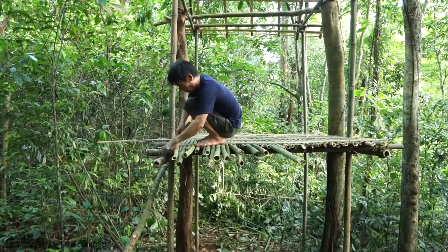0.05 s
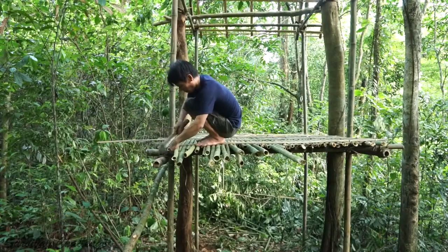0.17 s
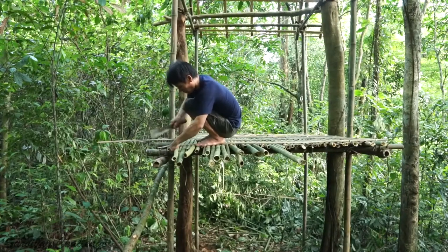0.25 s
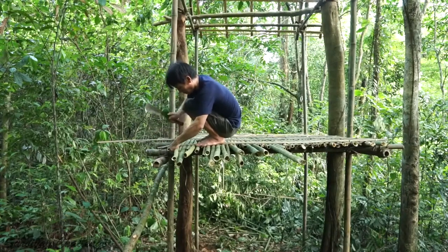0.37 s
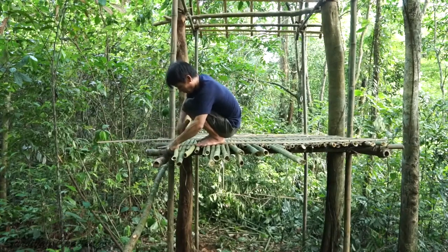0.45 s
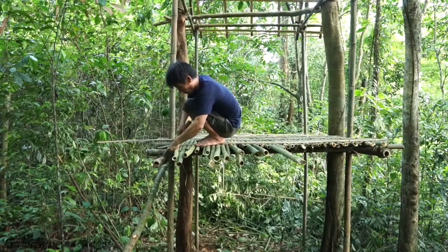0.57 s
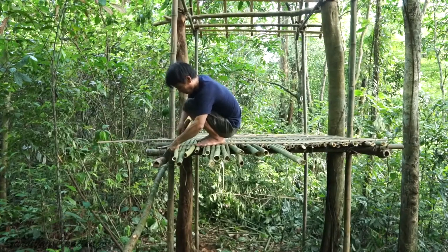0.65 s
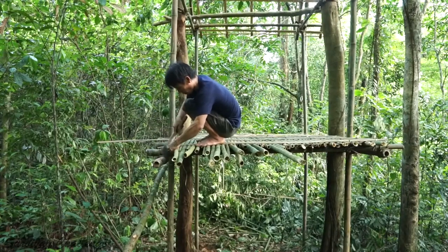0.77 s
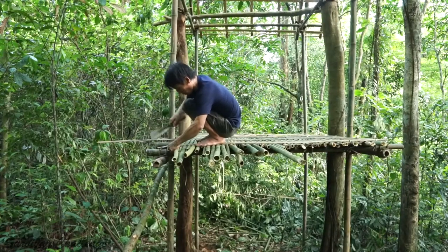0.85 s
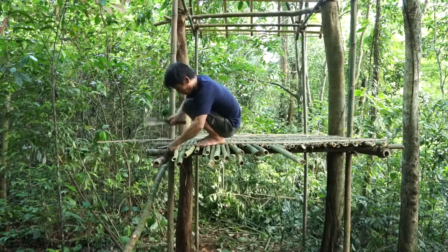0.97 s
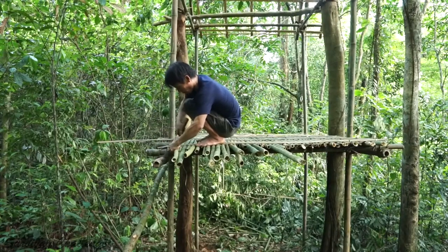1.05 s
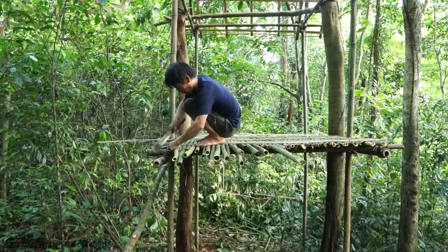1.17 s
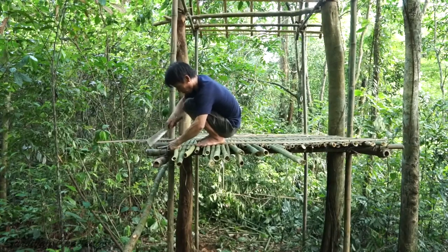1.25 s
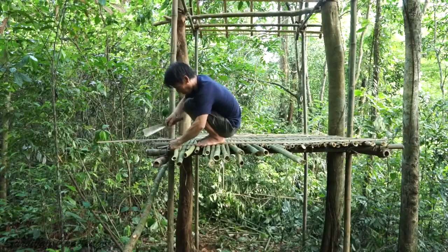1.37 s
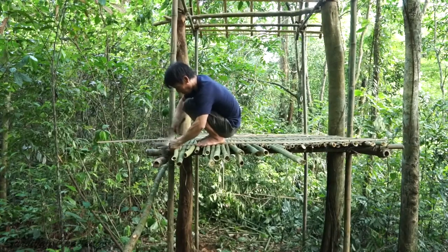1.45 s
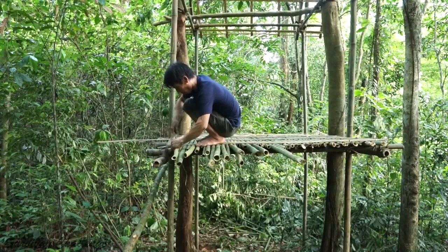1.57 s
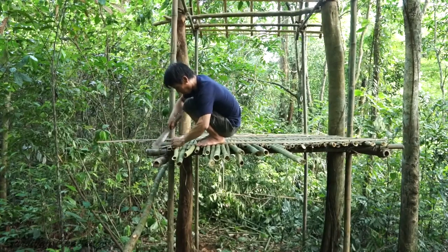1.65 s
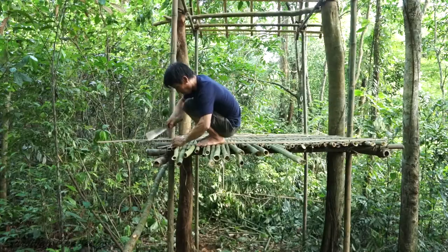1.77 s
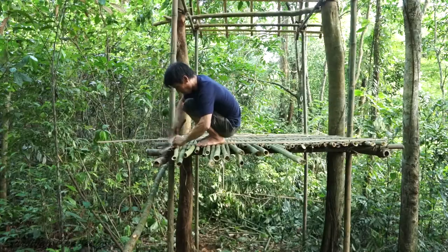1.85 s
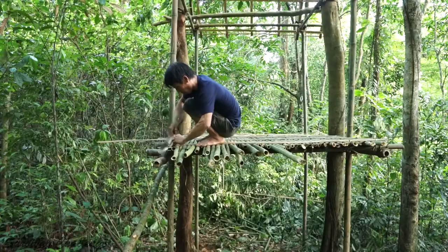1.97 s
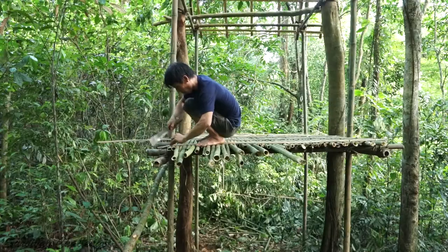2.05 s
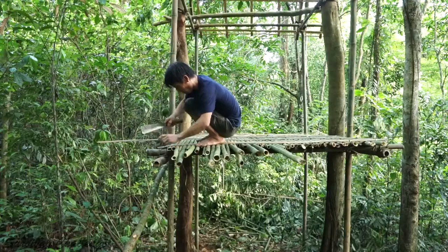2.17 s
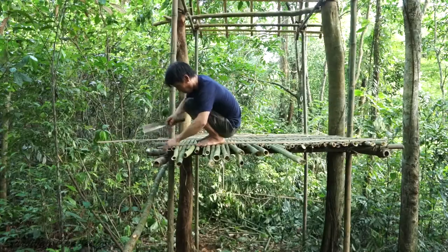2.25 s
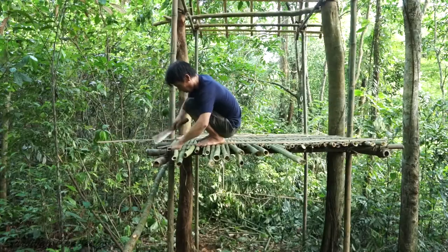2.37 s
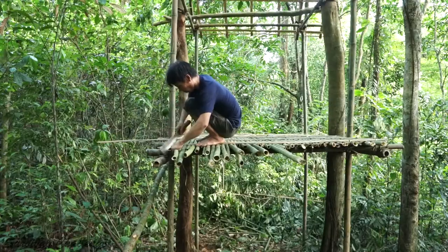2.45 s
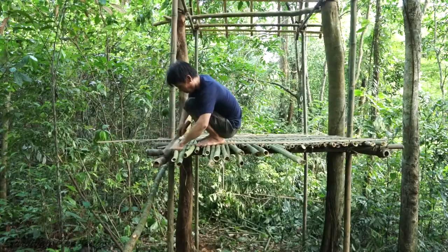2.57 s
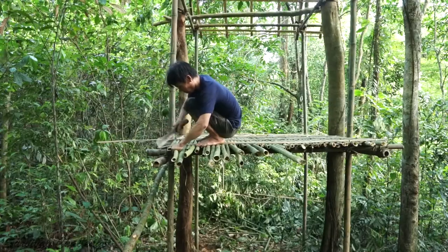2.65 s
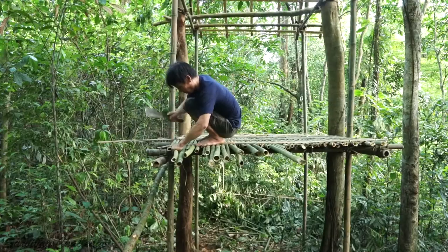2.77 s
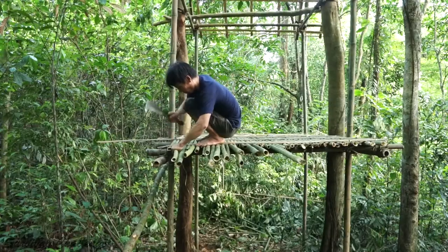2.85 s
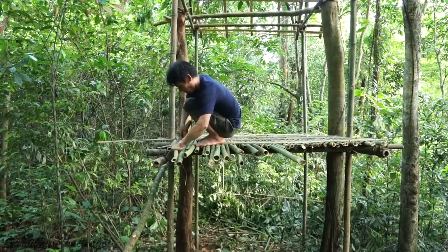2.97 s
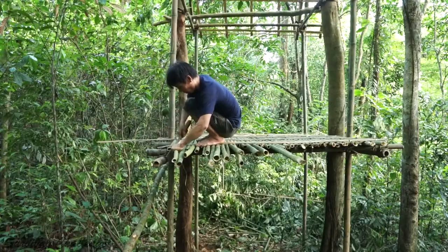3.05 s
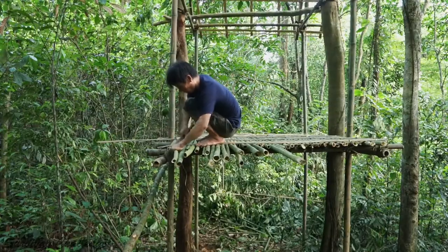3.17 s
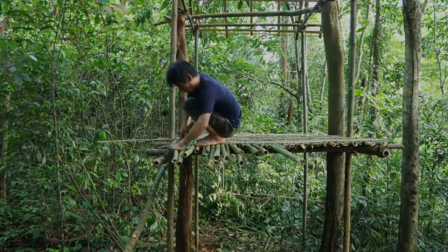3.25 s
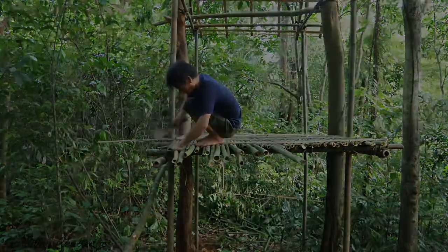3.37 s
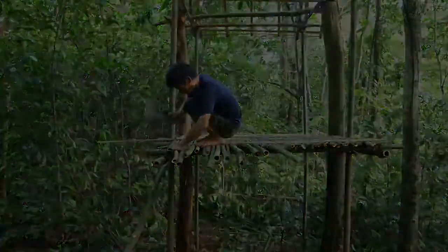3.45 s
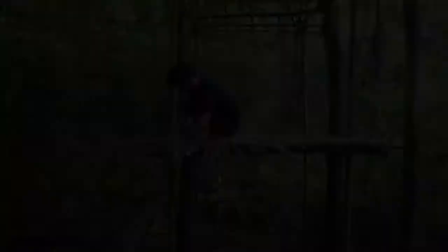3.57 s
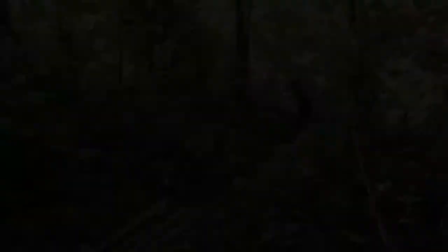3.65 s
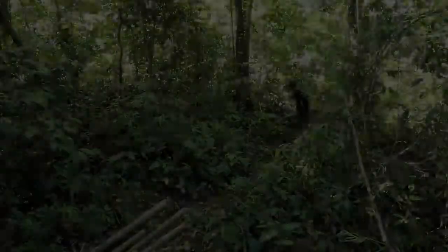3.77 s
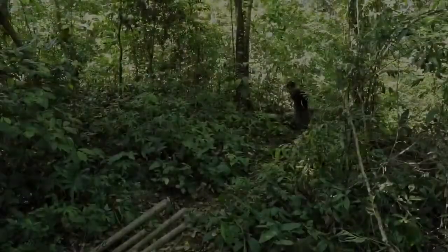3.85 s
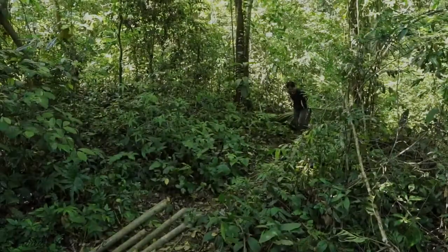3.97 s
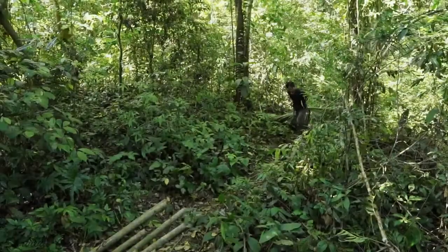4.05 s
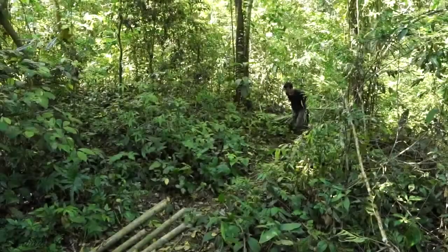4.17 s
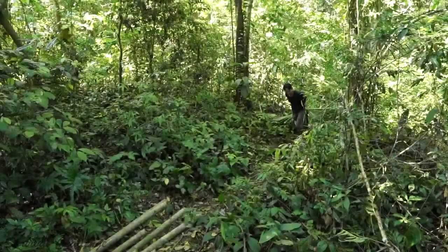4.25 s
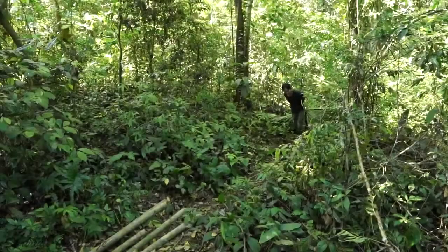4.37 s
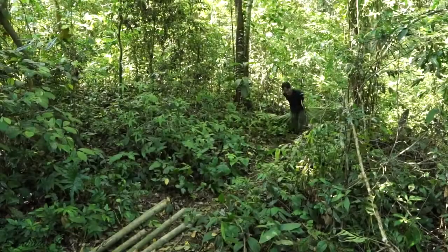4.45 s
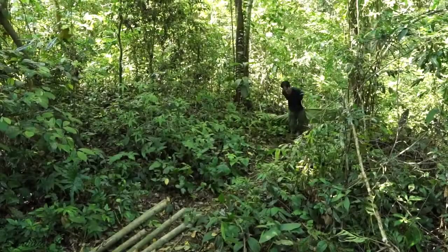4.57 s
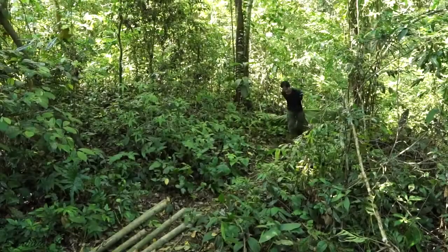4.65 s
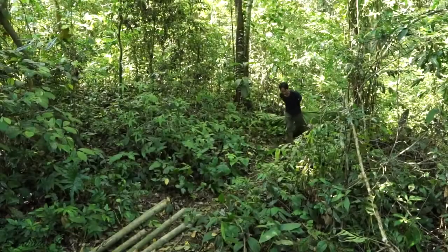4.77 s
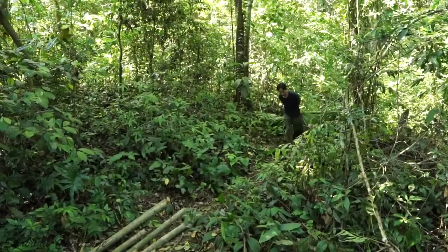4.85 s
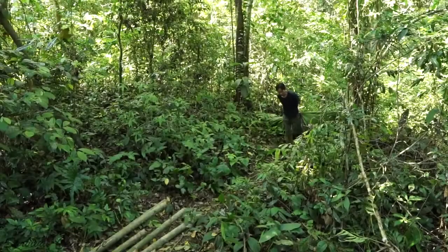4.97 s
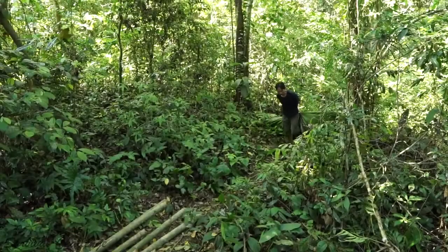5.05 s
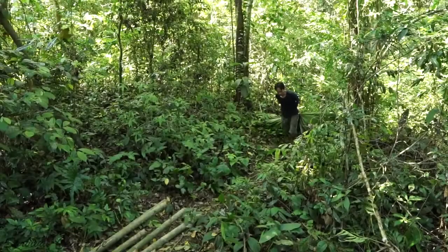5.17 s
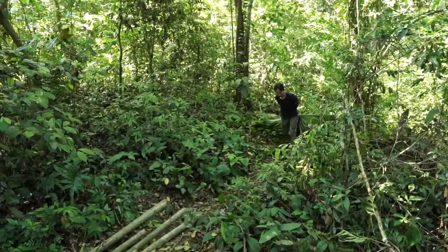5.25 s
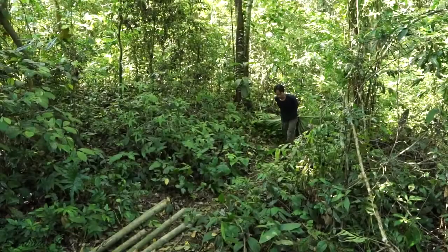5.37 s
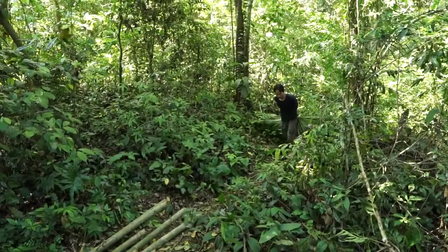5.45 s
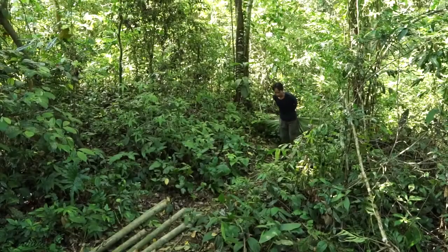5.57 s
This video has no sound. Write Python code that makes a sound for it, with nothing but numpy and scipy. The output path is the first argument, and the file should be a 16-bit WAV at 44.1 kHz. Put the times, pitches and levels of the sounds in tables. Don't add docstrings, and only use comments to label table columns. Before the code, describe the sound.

Outdoors in jungle, a blade strikes bamboo poles in six spaced blows, hollow and cracking, with loose poles chattering between and short echoes off trunks. Cicadas drone softly, a bee buzzes faintly, low mains hum sits underneath. After a tiny gap, a walker pushes through leaves: dense steady hiss, a few dry twig snaps. The microphone hears the knocks close, nearly mono.

```python
import sys
import numpy as np
from scipy import signal
from scipy.fft import rfft, irfft
from scipy.io import wavfile
from scipy.ndimage import uniform_filter1d

SR = 44100
rng = np.random.default_rng(int(sys.argv[2]) if len(sys.argv) > 2 else 0)


def linear_from_db(decibels):
    return 10 ** (np.asarray(decibels, float) / 20)


def master_out(mix):
    frames = np.transpose(np.atleast_2d(mix))
    ceiling = np.clip(frames, -1, 1)
    pcm = np.round(ceiling * 32767).astype(np.int16)
    wavfile.write(sys.argv[1], SR, pcm)


N = 247401
T = np.arange(N) / SR
CUT_S, RETURN_S = 3.655, 3.692

# (time [s], peak level [dB], crack level [dB], ring t60 [s], crack t60 [s])
BLOW_EVENTS = [
    (0.557, -0.5, 5.5, 0.13, 0.13),
    (1.1385, -5, -2, 0.1, 0.22),
    (1.575, -5, 5, 0.1, 0.056),
    (1.975, -5, 4, 0.16, 0.043),
    (2.605, -18, -4, 0.15, 0.09),
    (3.025, -4, 1.5, 0.066, 0.17),
]


def unit(x):
    return x / np.sqrt(np.mean(x ** 2))


def bump(s, width):
    return np.exp(-((T - s) / width) ** 2)


def butterworth(x, order, hz, kind="low"):
    return signal.sosfilt(signal.butter(order, hz, kind, fs=SR, output="sos"), x)


def ring(x, hz, width):
    return signal.lfilter(*signal.iirpeak(min(hz, 0.45 * SR), hz / width, SR), x)


def coloured(x, spectrum):
    hz, db = np.transpose(spectrum)
    log_hz = np.log(np.fft.rfftfreq(len(x), 1 / SR) + 1)
    gain = linear_from_db(np.interp(log_hz, np.log(hz), db))
    return unit(irfft(rfft(x) * gain, len(x)))


def walk(rate):
    hold = int(SR / rate)
    steps = np.repeat(rng.standard_normal(N // hold + 1), hold)
    return 0.98 * uniform_filter1d(uniform_filter1d(steps, hold), hold)[:N]


def grains(count, scatter_db):
    sizes = np.minimum(rng.exponential(size=count), 5)
    return rng.standard_normal(count) * linear_from_db(scatter_db * sizes)


def add(out, s, sound, peak_db):
    i = int(s * SR)
    out[i:i + len(sound)] += (sound * linear_from_db(peak_db) / np.abs(sound).max())[:N - i]


def knock(modes, crack_db, t60, crack_t60, rise):
    t = T[:SR // 3]
    onset = 1 - np.exp(-(t / max(rise, 1e-4)) ** 2)
    strike = linear_from_db(-60 * t / (0.0059 + 4 * rise))
    chatter = rng.standard_normal(len(t)) * onset
    body = np.zeros(len(t))
    for hz, width, db in modes:
        decay = linear_from_db(-60 * t / t60 * (1 + hz / 5000))
        body += linear_from_db(db) * ring(chatter * (strike + decay), hz, width) * np.sqrt(100 / width)
    skin = rng.standard_normal(len(t)) * np.sqrt(onset) * (linear_from_db(-60 * t / crack_t60) + 4 * strike)
    skin = butterworth(skin, 2, 2500, "high")
    sound = body / np.abs(body).max() + linear_from_db(crack_db - 3) * skin / np.abs(skin).max()
    return butterworth(sound, 4, 10800) + 0.094 * sound


def blows():
    # (frequency [Hz], bandwidth [Hz], level [dB])
    pole_modes = [
        [(1110, 140, 1.5), (2154, 34, -2.5), (2350, 26, -9), (2680, 25, -21), (2980, 52, -17), (4200, 60, -21),
         (6400, 46, -21), (7900, 34, -8)],
        [(1000, 120, 6.5), (1650, 24, -7), (2130, 39, -6.5), (3000, 17, -7), (4500, 37, -4.5), (6340, 165, -8),
         (8040, 31, -12)],
        [(960, 95, 1), (2570, 59, -10), (4700, 54, 5), (8750, 96, -19), (9430, 76, 13)],
        [(980, 89, 5.5), (1450, 39, -2), (2020, 200, -1), (4530, 58, -8), (6600, 65, 1), (7800, 19, -0.5),
         (7640, 81, -9)],
        [(360, 15, 11.5), (537, 74, 17), (1020, 24, 15), (1210, 47, -11), (1730, 34, 1)],
        [(886, 95, 4), (1610, 190, 6.5), (2580, 56, 7), (4000, 47, -20), (5900, 240, -11), (7300, 38, -18),
         (7500, 45, -4)],
    ]
    # (frequency [Hz], bandwidth [Hz], level [dB])
    slats = [(1900, 2200, -29)]
    out = np.zeros(N)
    for (s, db, crack_db, t60, crack_t60), modes in zip(BLOW_EVENTS, pole_modes):
        damped = [(hz, width + 60 + 0.05 * hz, level) for hz, width, level in modes]
        add(out, s, knock(damped + slats, crack_db, t60, crack_t60, rise=0.002), db + 4)
    return out


def taps():
    # (time [s], peak level [dB], body frequency [Hz], crack level [dB])
    tap_events = [(0.137, -18.5, 765, -18), (0.211, -15.5, 1320, 6), (0.224, -17.5, 1240, 9),
                  (0.241, -19, 507, 7), (0.478, -34, 684, 10), (1.389, -29.5, 2390, 9),
                  (1.489, -14, 3000, -32), (1.504, -20, 1070, 3), (1.542, -15.5, 3050, -17),
                  (1.597, -12.5, 980, -19), (1.613, -22, 877, -16), (1.644, -16.5, 1910, 4),
                  (1.672, -9, 2500, 1), (1.678, -22, 1080, -5), (1.705, -16.5, 2410, -3),
                  (1.749, -25, 2644, 7), (1.755, -19, 2750, -11), (1.886, -28.5, 2490, -12),
                  (2.299, -43, 1660, -13), (2.814, -17, 3320, 11), (2.828, -24, 3320, 8),
                  (3.127, -28, 1610, -13)]
    out = np.zeros(N)
    for s, db, hz, crack_db in tap_events:
        t60 = 0.087 * (1000 / hz) ** 0.36
        modes = [(hz, 0.14 * hz, 1.5), (2.64 * hz, hz, -7), (2000, 3500, -4)]
        add(out, s, knock(modes, crack_db, t60, 3 * t60, rise=0.0004), db)
    return out


def thuds():
    # (time [s], peak level [dB], frequency [Hz])
    thud_events = [(0.138, -25, 347), (0.155, -26, 333), (1.43, -42, 152), (2.404, -43, 138),
                   (2.679, -34, 150), (2.937, -39, 164), (3.227, -27, 476), (3.241, -24.5, 155),
                   (3.45, -33, 150), (3.482, -33, 110), (3.545, -31, 418), (3.608, -30, 163),
                   (3.644, -32, 181)]
    t60 = 0.063
    out, t = np.zeros(N), T[:SR // 4]
    for s, db, hz in thud_events:
        push = rng.standard_normal(len(t)) * linear_from_db(-60 * t / (1.63 * t60))
        add(out, s, ring(ring(push, hz, 4 / t60 + 0.096 * hz), hz, 3.7 * hz), db)
    return out


def booms():
    # (time [s], peak level [dB], frequency [Hz], t60 [s])
    boom_events = [(.137, -22, 1200, .08), (.214, -29.5, 500, 0.27), (.56, -10.5, 505, 0.2),
                   (.79, -31, 910, .2), (1.143, -24.5, 443, 0.42), (1.49, -26.5, 1090, 0.07),
                   (1.543, -26, 950, 0.08), (1.574, -7.5, 1090, 0.075), (1.59, -29, 252, 0.16),
                   (1.672, -18.5, 1080, .07), (1.98, -18.5, 380, 0.21), (1.976, -8.5, 1740, 0.079),
                   (2.604, -15, 1010, 0.11), (2.814, -22.5, 250, .025), (3.029, -15, 513, 0.12),
                   (3.027, -13, 1100, .09), (1.759, -31, 1400, 0.084), (3.432, -31, 137, 0.1),
                   (3.862, -21.5, 810, 0.056), (5.267, -36, 278, 0.072)]
    out, t = np.zeros(N), T[:SR // 4]
    for s, db, hz, t60 in boom_events:
        push = rng.standard_normal(len(t)) * linear_from_db(-60 * t / t60) * (1 - np.exp(-t / 0.0034))
        add(out, s, ring(ring(push, hz, 0.78 * hz), hz, 2.4 * hz), db)
    return out


def twigs():
    # (time [s], peak level [dB], accent frequency [Hz])
    snap_events = [
        (3.861, -10, 2600),
        (3.885, -18, 762),
        (3.939, -23, 872),
        (4.352, -11.5, 3250),
        (4.376, -16.5, 3400),
        (4.385, -20, 3610),
        (4.403, -20, 931),
        (4.448, -19, 861),
        (4.797, -19, 850),
        (5.267, -9.5, 7450),
    ]
    out, t = np.zeros(N), T[:SR // 10]
    for s, db, hz in snap_events:
        decay = linear_from_db(-60 * t / 0.033) + 1.1 * linear_from_db(-60 * t / 0.0046)
        crack = rng.standard_normal(len(t)) * decay
        broad = butterworth(crack, 3, (700, 9000), "band")
        add(out, s, broad + 1.7 * ring(crack, hz, 0.38 * hz), db - 0.6)
    return out


def trunks(source):
    # (frequency [Hz], level [dB], t60 [s])
    echo_bands = [
        (202, 6.5, 0.19),
        (754, 6, 0.17),
        (2500, -3, 0.43),
        (6000, 3, 0.48),
        (11000, -19, 0.93),
    ]
    t = T[:SR // 2]
    response = np.zeros(len(t))
    for hz, db, t60 in echo_bands:
        band = unit(ring(rng.standard_normal(len(t)), hz, 1.4 * hz))
        response += linear_from_db(db - 60 * t / t60) * band * np.sqrt(hz)
    response *= 1 - np.exp(-t / 0.0022)
    response /= np.sqrt(np.sum(response ** 2))
    return linear_from_db(-14.5) * signal.fftconvolve(source, response)[:N]


def swishes():
    # (time [s], rms level [dB], centre frequency [Hz], rise [s])
    brush_events = [(.212, -32, 4500, 0.022), (.215, -28.5, 1100, .02), (0.79, -37, 850, 0.017),
                    (1.359, -33.5, 4000, 0.034), (1.564, -18.5, 1610, 0.0023), (3.08, -26, 2500, 0.036),
                    (3.345, -35, 1000, 0.015), (3.15, -29, 3000, 0.04), (3.861, -29.5, 3500, 0.0031),
                    (3.88, -31, 1500, .06), (4.3, -40, 6000, 0.041), (4.353, -37, 4000, 0.0037),
                    (4.63, -43, 900, .04), (4.781, -40, 2500, .02)]
    events = [(*row, 0.22) for row in brush_events]
    for s, db, _, _, crack_t60 in BLOW_EVENTS:
        events.append((s, db - 22, 2600, 0.014, 0.21 + 1.7 * crack_t60))
    out, t = np.zeros(N), T[:SR // 2]
    for s, db, hz, rise, t60 in events:
        ticks = ring(grains(len(t), scatter_db=3.5), hz, 2.15 * hz)
        ticks = unit(butterworth(ticks, 3, 10500))
        envelope = (1 - np.exp(-(t / rise) ** 2)) * linear_from_db(db - 60 * t / t60)
        i = int(s * SR)
        out[i:i + len(t)] += (ticks * envelope)[:N - i]
    return out


def leaves():
    # (frequency [Hz], spectral density [dB per Hz])
    leaf_spectrum = [(30, -34), (80, -17.5), (146, -17), (400, -14.5), (800, -14), (2250, -18),
                     (4860, -19.5), (9790, -23.5), (12100, -33.5), (14000, -38), (16000, -37)]
    bed = coloured(grains(N, scatter_db=1.3), leaf_spectrum)
    crisp = butterworth(bed, 2, 4000, "high")
    mix = (bed - crisp) * linear_from_db(1.2 * walk(25)) + crisp * linear_from_db(0.75 * walk(35))
    stride_s, stride_peak_s, stride_db = 0.56, 4.096, 0.93
    stride = stride_db * np.cos(2 * np.pi * (T - stride_peak_s) / stride_s)
    approach = -4 * bump(RETURN_S, 0.14)
    return mix * linear_from_db(-37 + 4 + stride + approach)


def bee():
    # (nearest time [s], passing width [s], level [dB], wing-beat frequency [Hz])
    bee_passes = [
        (.95, .3, -56, 235.7),
        (1.32, .15, -57.5, 235),
        (2.05, 0.22, -51, 234.4),
        (2.65, 0.11, -50, 240.6),
        (2.95, .12, -59, 247),
    ]
    hz = np.interp(T, [row[0] for row in bee_passes], [row[3] for row in bee_passes])
    phase = 2 * np.pi * np.cumsum(hz * (1 + 0.0041 * walk(29.05))) / SR
    wings = np.sin(phase) + 0.5 * np.sin(2 * phase) + 0.27 * np.sin(3 * phase)
    near = sum(linear_from_db(db) * bump(s, width) for s, width, db, _ in bee_passes)
    return np.sqrt(2) * wings * near * linear_from_db(0.88 * walk(4.3))


def choir(hz, width, rate):
    clicks = (rng.random(N) < 15 * rate / SR) * rng.standard_normal(N)
    throb = linear_from_db(1.2 * walk(rate / 4) + 0.4 * walk(3))
    return unit(ring(ring(clicks * throb, hz, 1.02 * width), hz, 1.02 * width))


def cicadas(late):
    # (frequency [Hz], bandwidth [Hz], platform level [dB], undergrowth level [dB], click rate [1/s])
    choir_bands = [
        (3726, 360, -46, -47.5, 300),
        (4820, 420, -55.5, -50.5, 120),
        (7190, 230, -57.5, -63, 320),
        (7580, 220, -61, -59, 180),
        (1675, 12, -62, -77, 190),
        (5470, 460, -65, -152, 450),
    ]
    lull = -3 * bump(3.23, 0.15)
    out = np.zeros(N)
    for hz, width, near_db, far_db, rate in choir_bands:
        level_db = np.where(late, far_db, near_db + lull * (hz > 6500))
        out += choir(hz, width, rate) * linear_from_db(level_db)
    return out


def cricket():
    since = np.maximum(T - 0.22, 0)
    swell = 1 - np.exp(-(since / 0.06) ** 2)
    trill = swell * linear_from_db(-50.5 - 60 * since / 1.3) * (T < 0.49)
    return choir(10700, 350, 224) * trill


def forest_air():
    # (frequency [Hz], spectral density [dB per Hz])
    air_spectrum = [(30, -27), (70, -7), (130, -10.5), (200, -8.5), (350, -15), (480, -8), (1000, -9.5),
                    (3000, -16), (6500, -19.5), (8500, -25.5), (12000, -30), (16000, -32)]
    # (time [s], level rise [dB])
    sway_events = [
        (.8, 4),
        (1.3, 4.5),
        (1.9, 1.5),
        (3.25, 4.5),
    ]
    sway_db = sum(db * bump(s, 0.13) for s, db in sway_events)
    noise = coloured(rng.standard_normal(N), air_spectrum)
    return noise * linear_from_db(-48 + sway_db + 0.5 * walk(9.45))


def gain_control():
    # (time [s], hum level [dB])
    duck_events = [
        (0, -33),
        (.558, -36),
        (1.141, -36.5),
        (1.577, -35),
        (1.978, -33),
        (3.028, -37),
        (3.67, -29),
        (5.266, -35),
    ]
    full_db, recover_s = -29.5, 1.07
    s, db = np.transpose(duck_events)
    last = np.clip(np.searchsorted(s, T, side="right") - 1, 0, len(s) - 1)
    gain_db = full_db + (db[last] - full_db) * np.exp(-(T - s[last]) / recover_s)
    return uniform_filter1d(gain_db, size=441)


def camera(late, gain_db):
    # (harmonic number [1], level [dB])
    hum_partials = [(1, -6.5), (2, -26.5), (3, -24), (5, -32), (6, -39), (7, -36.5)]
    # (harmonic number [1], level [dB])
    whine_partials = [(1, -4), (2, -14), (3, -4), (4, -2.5)]
    # (platform level [dB], undergrowth level [dB])
    whine_levels = (-68, -49.5)
    mains_hz, whine_hz = 50, 3233.5
    turns = mains_hz * (T + late * 0.001)
    hum_turns = turns - 0.297
    hum = sum(linear_from_db(db) * np.cos(2 * np.pi * k * hum_turns) for k, db in hum_partials)
    since = (turns - 0.5) % 1
    whine_phase = 2 * np.pi * whine_hz * since / mains_hz
    whine = sum(linear_from_db(db) * np.sin(k * whine_phase) for k, db in whine_partials)
    gate = uniform_filter1d(1.0 * (since < 0.5), size=24)
    whine_gain = linear_from_db(np.where(late, whine_levels[1], whine_levels[0]))
    return np.sqrt(2) * hum * linear_from_db(gain_db), 2 * whine * gate * whine_gain


def preamp_noise(late):
    # (frequency [Hz], spectral density [dB per Hz])
    preamp_spectrum = [(35, -30), (100, -3), (200, -3), (600, -7), (900, -12), (3000, -21), (5000, -19),
                       (8000, -12), (11500, -10), (14600, -9.5), (16000, -10)]
    return coloured(rng.standard_normal(N), preamp_spectrum) * linear_from_db(np.where(late, -64, -61))


def scene():
    late = T > (CUT_S + RETURN_S) / 2
    gain_db = gain_control()
    duck = linear_from_db(gain_db - np.where(late, gain_db.max(), np.median(gain_db[~late])))
    hum, whine = camera(late, gain_db)
    impacts = blows() + taps() + thuds() + booms() + twigs()
    events = impacts + trunks(impacts) + swishes() + cricket() + bee() * ~late
    steady = whine + cicadas(late) + forest_air() * ~late + leaves() * late
    mid = events + hum + duck * steady
    side = duck * preamp_noise(late)
    edit = np.clip(np.where(late, (T - RETURN_S) / 0.024, (CUT_S - T) / 0.00035), 0, 1)
    return np.array([mid + side, mid - side]) * edit


def top_cut(x):
    return signal.sosfilt(signal.butter(12, 16810, fs=SR, output="sos"), x)


def record(dry):
    limited = np.tanh(1.021 * dry) / 1.175 * 1.125
    low_pass = signal.ellip(8, 0.2, 45, 15900, fs=SR, output="sos")
    return top_cut(signal.sosfilt(low_pass, limited))


dry = scene()
out = record(dry)
master_out(out)
```